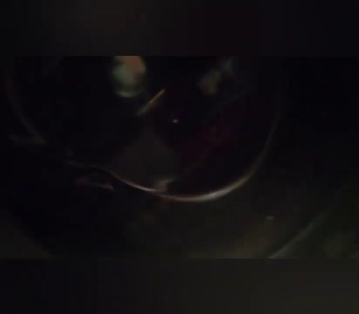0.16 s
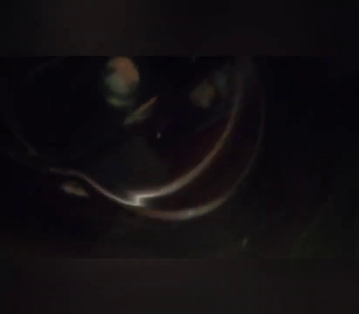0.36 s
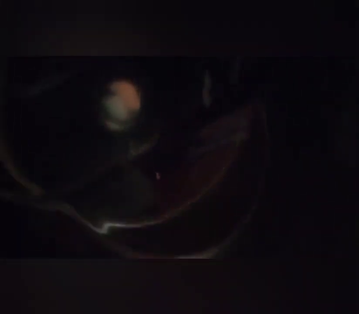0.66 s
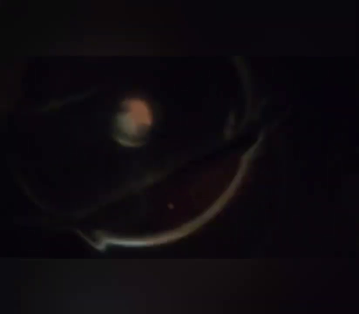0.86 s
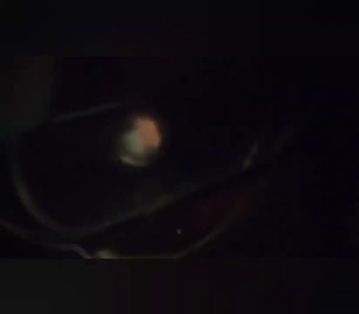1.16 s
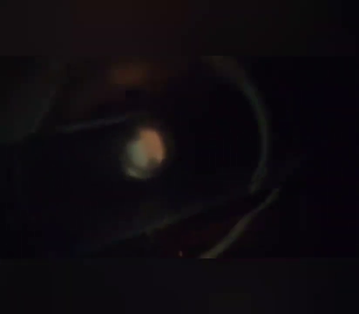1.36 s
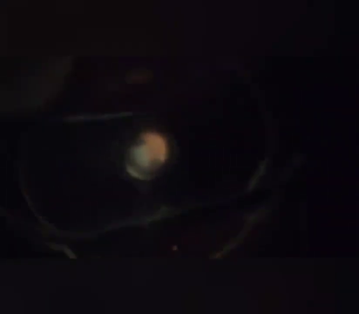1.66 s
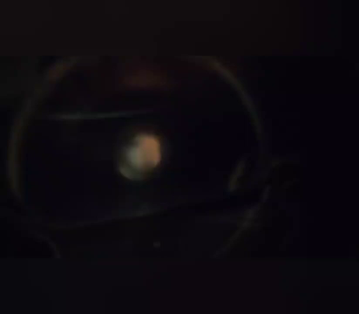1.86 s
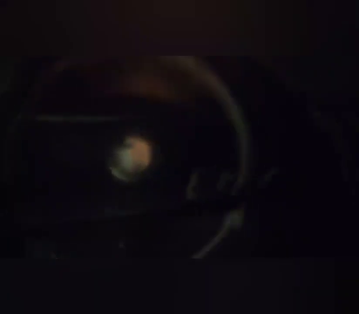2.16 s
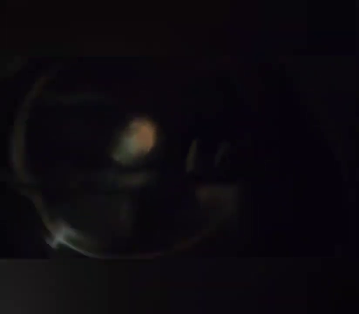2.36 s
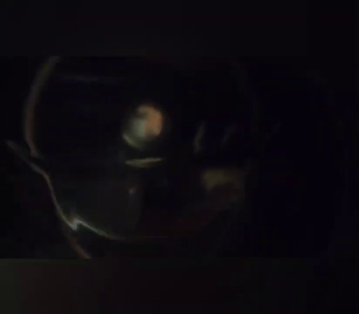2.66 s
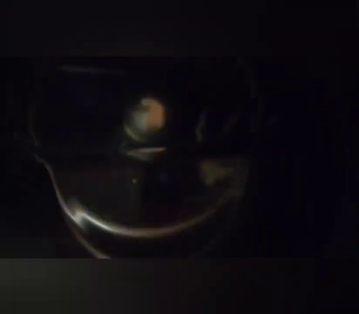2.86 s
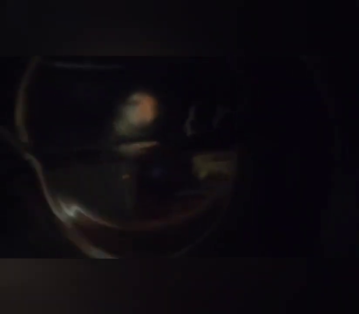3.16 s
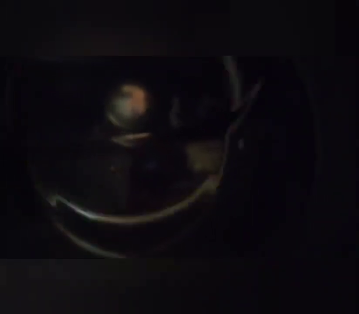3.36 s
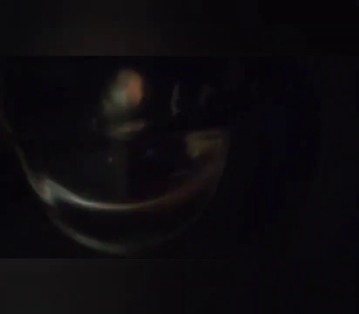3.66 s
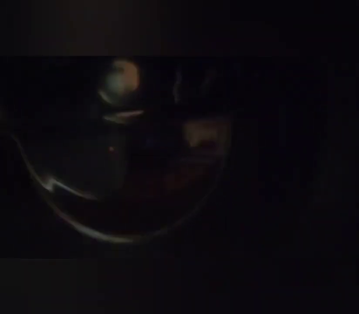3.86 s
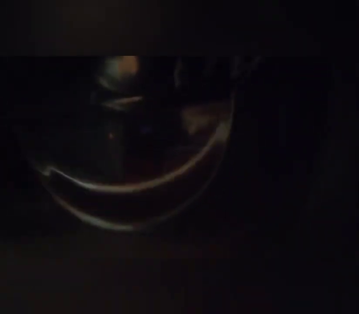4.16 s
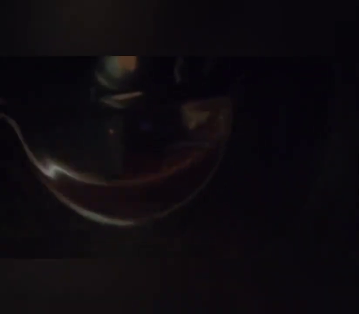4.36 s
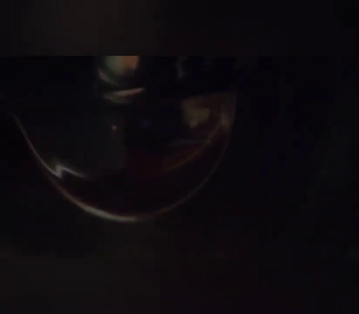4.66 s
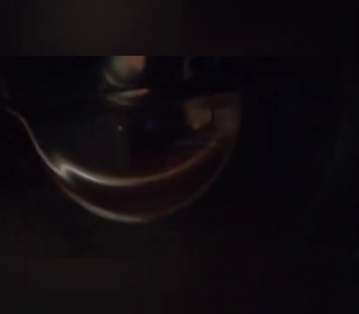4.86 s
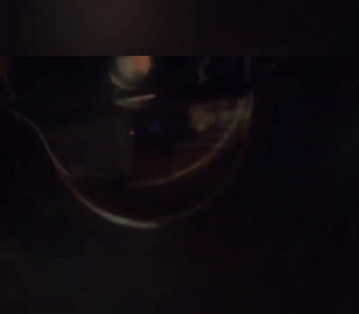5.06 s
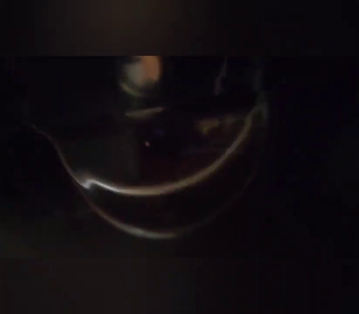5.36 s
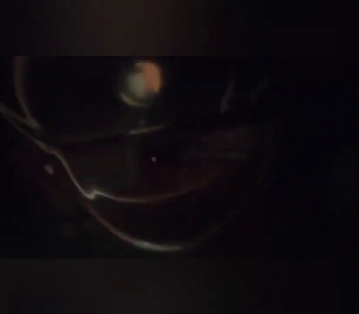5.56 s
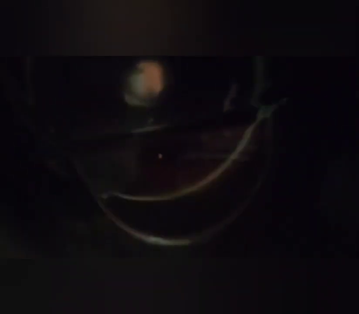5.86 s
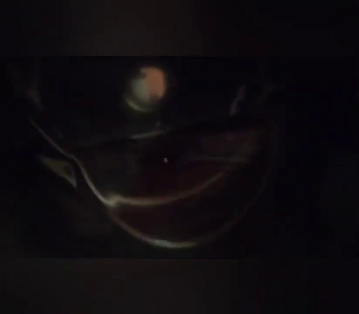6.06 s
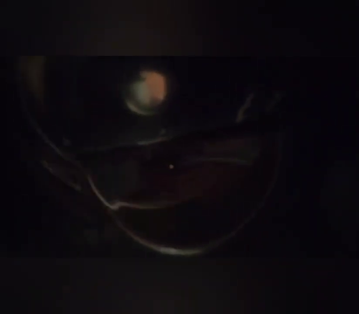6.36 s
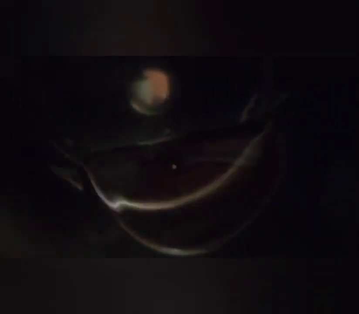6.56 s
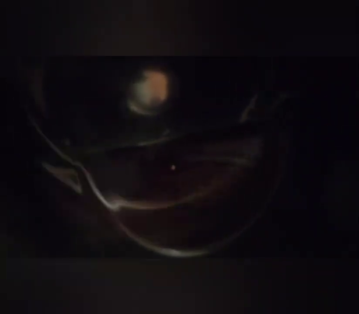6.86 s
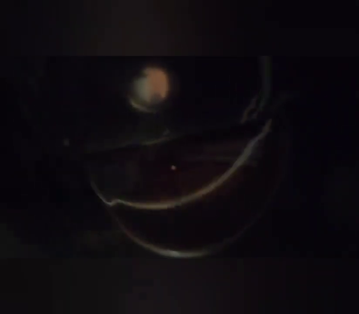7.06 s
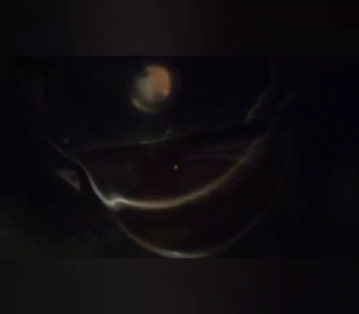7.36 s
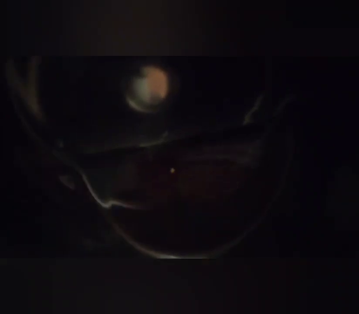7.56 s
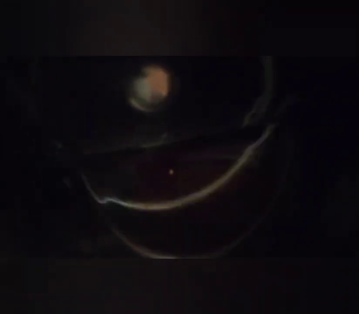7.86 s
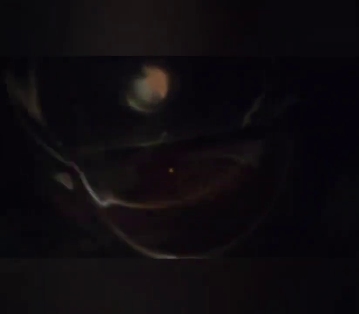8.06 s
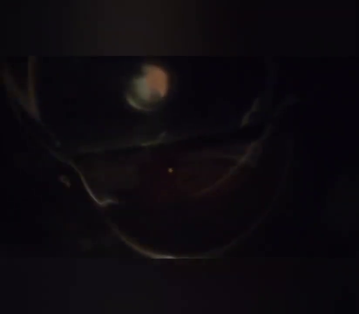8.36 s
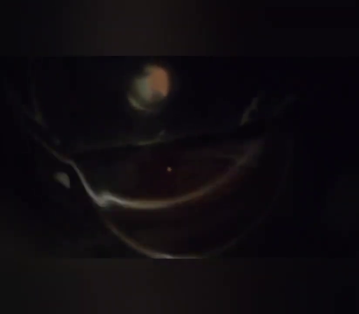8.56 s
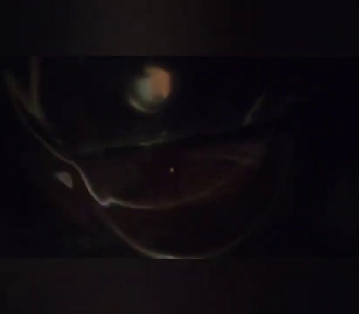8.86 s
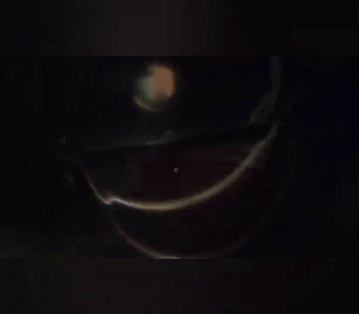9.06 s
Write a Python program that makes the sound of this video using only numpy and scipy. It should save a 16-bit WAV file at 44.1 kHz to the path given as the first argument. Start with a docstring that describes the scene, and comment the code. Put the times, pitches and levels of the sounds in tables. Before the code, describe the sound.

A front-loading washer spins fast and steadily, its drum throbbing deeply about twelve times a second beneath a piercing, fluttering motor whine.

```python
"""Washing machine in a fast spin

A front-loader spins steadily at about 750 rpm in a small room, heard by a hand-held stereo microphone near its door.
The unbalanced load shoves the cabinet and taps a loose panel once a turn: both are sums or rings locked to the drum.
Bearings and panels rattle in a pattern repeated each turn, and the mains hum beats slowly with the drum's throb.
The belt-driven motor buzzes and whines; its speed sways with every drum turn, and wall echoes make the whine flutter.
Shaped noise gives the air churned by the drum and the hiss of the brushes."""
import sys
import numpy as np
from scipy.fft import rfft, irfft, next_fast_len
from scipy.io import wavfile
from scipy.ndimage import uniform_filter1d, map_coordinates

SR = 44100
rng = np.random.default_rng(int(sys.argv[2]) if len(sys.argv) > 2 else 0)


def unload_wav(signal):
    """Save mono or channel-first audio to the path in sys.argv[1] as 16-bit WAV at rate SR, clipped to [-1, 1]."""
    wavfile.write(
        sys.argv[1],
        SR,
        np.round(np.clip(np.atleast_2d(signal).T, -1, 1) * 32767).astype(np.int16),
    )


N = 405719
T = np.arange(N) / SR  # time of each sample [s]

DRUM_HZ = 12.4465  # drum turns a second
MOTOR_HZ = 197.91  # mean motor turns a second
MAINS_HZ = 49.95
TOP_HZ = 15700  # band limit of the recorder


def amp(db):
    """Decibels to gain."""
    return 10 ** (np.asarray(db) / 20)


def along(points, hz):
    """(frequency [Hz], value) points read on a log frequency axis."""
    f, v = np.transpose(points)
    return np.interp(np.log(hz + 1), np.log(f + 1), v)


def curves(rows):
    """One value per sample for each column after the time."""
    s, *cols = np.transpose(rows)
    return np.array([np.interp(T, s, c) for c in cols])


def meander(steps):
    """A smooth random value for each sample's place on a path, one knot a step."""
    coarse = np.abs(steps[::64])
    knots = rng.standard_normal(1024)
    smooth = map_coordinates(knots, [coarse], mode="mirror")
    return np.interp(T, T[::64], smooth)


def wobble(rate):
    """A smooth random curve in time, rate knots a second."""
    return meander(rate * T)


def filtered(x, response):
    """x times a response of frequency, zero-padded so that its end does not wrap round."""
    m = next_fast_len(N + SR // 4)
    return irfft(rfft(x, m) * response(np.fft.rfftfreq(m, 1 / SR)), m)[..., :N]


def cycle(lines, size=8192):
    """The sound of one turn from its complex rms multiples 1, 2, ..; read it at any number of turns."""
    shape = irfft(np.r_[0, lines], size) * size / np.sqrt(2)
    step = np.roll(shape, -1) - shape

    def read(turns):
        at = turns * size
        whole = np.floor(at)
        i = whole.astype(int) % size
        return shape[i] + (at - whole) * step[i]
    return read


def scattered(gains):
    """Lines of the given strengths at random phases."""
    return gains * np.exp(2j * np.pi * rng.random(len(gains)))


def sides(lean_db):
    """Left and right gains, lean_db apart, at constant power."""
    ratio = amp(lean_db)
    return np.array([ratio, np.ones_like(ratio)]) * np.sqrt(2 / (1 + ratio ** 2))


def load(t, peak_s):
    """The pull of the unbalanced load, once a drum turn."""
    return np.cos(2 * np.pi * DRUM_HZ * (t - peak_s))


def throb(depth_db, peak_s, count=1):
    """A swell and a notch, count times a drum turn, as a swaying tone beats against its strongest echo."""
    echo = np.clip(np.log(amp(depth_db)), -.9, .9)  # a negative depth puts the notch at peak_s
    return np.sqrt(1 + 2 * echo * load(count * T, count * peak_s) / (1 + echo ** 2))


# the hand's path through the echoes, quick in three spells and slow between:
# (time [s], path travelled [cm])
HAND_PATH = [(0, 0), (2.5, 22.5), (3.3, 24), (4.1, 28.5), (5.2, 31), (6.2, 37.5), (9.2, 41)]


def room(sound, wall_db, spread_s, sway_s, apart_s, count=4, patch_cm=6):
    """Each ear gets sound(time) directly and off walls whose paths meander as the hand travels."""
    travel_cm, = curves(HAND_PATH)
    ears = []
    for lead in (apart_s / 2, -apart_s / 2):
        ear = sound(T + lead)
        delays = spread_s * (np.arange(count) + rng.random(count)) / count
        for delay in delays:
            sway = sway_s * meander(travel_cm / patch_cm)
            ear = ear + amp(wall_db) * sound(T - delay - sway)
        ears.append(ear / np.sqrt(1 + count * amp(wall_db) ** 2))
    return np.array(ears)


def motor_turns(sway=.0026, fastest_s=.006, drift=.0003):
    """The motor's angle as a function of time: the load speeds and brakes it through the belt."""
    speed_hz = MOTOR_HZ * (1 + sway * load(T, fastest_s) + drift * wobble(14))
    ahead = np.cumsum(speed_hz) / SR - MOTOR_HZ * T
    return lambda t: MOTOR_HZ * t + ahead[np.clip((t * SR).astype(int), 0, N - 1)]


# the cabinet's answer to the load, before the microphone's place colours it:
# (multiple of the drum speed, level [dB rms])
CABINET_LINES = [(1, -41.5), (2, -60), (3, -51), (4, -52), (5, -43.1), (6, -57), (7, -55.5), (8, -58.5),
                 (9, -31), (10, -35.3), (11, -34.5), (12, -55.5), (13, -57), (14, -58), (15, -48),
                 (16, -61.5), (17, -56), (18, -67), (19, -60), (20, -59.5), (21, -46), (22, -56.5),
                 (23, -61), (24, -56), (25, -63), (26, -61), (27, -66), (28, -53.5), (29, -63), (30, -61),
                 (31, -65), (32, -67)]


def cabinet(size=128):
    """One shove a turn: the cabinet booms at once and rings down until the next."""
    order, db = np.transpose(CABINET_LINES)
    level_db = np.interp(np.arange(size // 2 + 1), order, db)
    # fold the cepstrum forward: minimum phase, so that the ring follows the shove
    cepstrum = irfft(np.log(amp(level_db)))
    cepstrum[1:size // 2] *= 2
    cepstrum[size // 2 + 1:] = 0
    boom = cycle(np.exp(rfft(cepstrum))[1:len(order) + 1])
    turns = DRUM_HZ * T + 0.0026 * wobble(7.2)
    return boom(turns) * amp(0.14 * wobble(5))


def knock(ring_hz=792):
    """A loose panel is tapped softly once a drum turn and rings briefly."""
    level_db, onset_s, attack_s, t60_s = -32.5, .006, .008, .06
    age = (T - onset_s) % (1 / DRUM_HZ)  # seconds since the last tap
    decay = amp(level_db - 60 * age / t60_s + 0.74 * wobble(12))
    envelope = (1 - np.exp(-age / attack_s)) * decay
    return envelope * np.sin(2 * np.pi * ring_hz * age)


# bearings and panels, before the microphone's place colours them:
# (frequency [Hz], level of each drum multiple [dB rms])
RATTLE_LEVELS = [(400, -61.5), (490, -64), (570, -57.5), (640, -63.5), (700, -55), (790, -53), (840, -54.5),
                 (920, -62.5), (1100, -62), (1400, -64.5), (1800, -65.5), (2250, -70), (2480, -66),
                 (3000, -85)]


def rattle(apart_hz=1100):
    """Bearings and panels repeat nearly the same pattern every turn; short waves reach the ears out of step."""
    first = len(CABINET_LINES) + 1  # the multiples above the cabinet's own
    hz = DRUM_HZ * np.arange(first, 250)
    lines = scattered(amp(along(RATTLE_LEVELS, hz) + rng.normal(0, 1, len(hz))))
    twist = np.exp(1j * rng.standard_normal(len(hz)) * hz / apart_hz)
    turns = DRUM_HZ * (T + .00003 * wobble(20))
    below = np.zeros(first - 1)
    ears = [cycle(np.r_[below, lines * ear])(turns) for ear in (twist, 1 / twist)]
    return np.array(ears) * amp(0.68 * load(T, 0.0082) + 0.21 * wobble(11))


# mains hum, before the microphone's place colours it:
# (multiple of the mains frequency, level [dB rms])
HUM_LINES = [(2, -41.3), (3, -60), (4, -56.5), (6, -50.5), (8, -61.5)]


def hum():
    """The mains hum of the windings slides slowly against the drum's throb."""
    return sum(np.sqrt(2) * amp(db) * np.sin(2 * np.pi * round(k) * MAINS_HZ * T)
               for k, db in HUM_LINES)


# rotor unbalance and slot tones, relative: (multiple of the motor speed, level [dB])
ROTOR_LINES = [(1, -45), (2, -52), (4, -53), (13, -61), (24, -60), (28, -60), (54, -67), (72, -70)]
# buzz of the brushes, relative: (frequency [Hz], level of each motor multiple [dB])
BUZZ_LEVELS = [(600, -73), (1700, -70), (2300, -57), (3350, -62), (4300, -71), (5300, -70.5), (6200, -61),
               (7600, -60.5), (8600, -68), (9400, -69), (10200, -73), (12000, -87.5), (14500, -78),
               (15500, -90)]


def buzz(angle):
    """The rotor and its brushes give a comb of motor multiples, all but the lowest swelling with the load."""
    db = along(BUZZ_LEVELS, MOTOR_HZ * np.arange(1, 79))
    for order, level in ROTOR_LINES:
        db[round(order) - 1] = level
    lines = scattered(amp(db))
    low = np.arange(len(lines)) < 4
    shake, brushes = cycle(lines * low), cycle(lines * ~low)
    comb = room(lambda t: brushes(angle(t)), wall_db=-2, spread_s=.06, sway_s=.00012,
                apart_s=.00003, count=5)
    swell = amp(1.8 * load(T, -.002) - .6)
    # the long waves of the lowest multiples reach both ears alike
    return shake(angle(T)) * amp(wobble(2.035)) + comb * swell


# how alike the air noise is at both ears: (frequency [Hz], left-right correlation [-1 to 1])
EAR_LIKENESS = [(30, 1), (100, -0.52), (250, 0.28), (500, -0.36), (1000, -0.44), (2500, -0.056),
                (8000, -0.18)]


def rush(spectrum):
    """Stereo noise, fully alike at both ears only in the deepest bass."""
    def response(hz):
        turn = np.arccos(np.clip(along(EAR_LIKENESS, hz), -1, 1)) / 2
        return amp(along(spectrum, hz)) * [np.cos(turn), np.sin(turn)]

    white = rng.standard_normal((2, N)) * np.sqrt(SR / 2)  # unit power per Hz
    mid, side = filtered(white, response)
    return np.array([mid + side, mid - side])


# air swept round by the drum, relative: (frequency [Hz], density [dB per Hz])
AIR_SPECTRUM = [(12, -69), (45, -79), (62, -61.5), (85, -67), (125, -62), (220, -67.5), (350, -69.5),
                (500, -77), (780, -69.5), (1500, -74), (2500, -80), (3300, -82.5), (5000, -105)]
# brush hiss, relative: (frequency [Hz], density [dB per Hz])
HISS_SPECTRUM = [(2000, -105), (3300, -79.5), (4300, -86), (6200, -82.5), (7500, -79.5), (9000, -93),
                 (11500, -102), (14500, -103), (15700, -108)]


def air(angle):
    """The drum churns the air; the brushes hiss harder once a motor turn and under load."""
    churn = rush(AIR_SPECTRUM) * amp(0.54 * load(T, 0.037) + 0.43 * wobble(7.9))
    hiss = rush(HISS_SPECTRUM) * amp(0.51 * np.cos(2 * np.pi * angle(T)) + 0.2 * load(T, -0.0051))
    return churn + hiss


# the machine's lean across the stereo microphone: (frequency [Hz], left minus right [dB])
STEREO_LEAN = [(100, .7), (250, 1.5), (500, 1.5), (1100, 5.5), (2500, 5), (4500, 3), (6500, 4), (7200, 0),
               (8300, -10), (9700, 0), (12000, 1), (14500, 5)]
# band gains at the moving microphone:
# (time [s], low mids [dB], upper mids [dB], treble [dB])
BAND_REACH = [(0, -0.9, 0.3, 3.4), (1.3, 2, -2.3, 3), (2.6, -0.4, -3.5, 2.2), (3.4, -1.0, -3, 2),
              (4.1, -1, 1, 1), (5.3, -0.3, -0.9, 1.5), (6.5, 0.4, -0.5, 1.5), (9.2, 1.2, 0.1, 0.9)]
# middles of the three bands, between two steady ends: frequency [Hz]
BAND_CENTRES = [230, 750, 2000, 5500, 40000]


def position(x):
    """Each band has its own left-right lean; three bands come and go as the microphone moves."""
    x = filtered(x, lambda hz: sides(along(STEREO_LEAN, hz)))
    out = x
    for k, db in enumerate(curves(BAND_REACH)):
        # a triangle: one at this band's middle, zero at its neighbours'
        share = list(zip(BAND_CENTRES, np.arange(len(BAND_CENTRES)) == k + 1))
        band = filtered(x, lambda hz: along(share, hz))
        out = out + band * (amp(db) - 1)
    return out


def whine(angle, order, heard, wall_db, flicker_db, evenness, shared, split_db=3):
    """A swaying motor tone beats against its echoes; evenness sets its steadiness, from fluttering to smooth."""
    level_db, lean_db = curves(heard)
    tone = room(lambda t: np.cos(2 * np.pi * order * angle(t)), wall_db, spread_s=.08,
                sway_s=.0001, apart_s=.00003, count=6)
    tone = tone + shared * tone[::-1]  # the ears are close, so they share part of their echoes

    def rms(size):
        return np.sqrt(np.abs(uniform_filter1d(tone ** 2, size, axis=1)) + 1e-9)

    # levelling over a whole turn keeps the flutter, levelling over 128 samples smooths it
    even = np.clip(evenness, 0, .8)
    flutter = tone / (rms(128) ** even * rms(round(SR / DRUM_HZ)) ** (1 - even))
    # where evenness is low, the tone also breaks into two pulses a turn and flickers
    split = throb(split_db * (1 - even), peak_s=0.0083, count=2)
    level = amp(level_db + flicker_db * (1 - even) * wobble(60))
    return level * sides(lean_db) * flutter * split / np.sqrt(2)


# the commutator tones, as the microphone passes through their standing waves, before they throb:
# (time [s], amplitude [dB], left minus right [dB])
LOWER_TONE = [(0, -33, 16), (0.55, -38.5, -2), (0.8, -36.3, 11), (1.05, -38.5, 14), (1.8, -39.5, 10),
              (2.1, -33, 7), (3.15, -33.5, 9), (3.55, -30, 11), (4.25, -37, -6.5), (5.25, -36, -2),
              (6.05, -43.5, 2), (6.9, -38.5, 4.5), (9.2, -40, 4)]
UPPER_TONE = [(0, -37, -1), (0.35, -36, -5), (0.8, -42.5, -1), (1.1, -36, 6), (1.6, -46.1, -1),
              (1.95, -36.5, 10), (2.25, -38, -9), (2.6, -40, -1), (3.4, -41, -5), (3.8, -37.5, 1),
              (5.05, -41, 0), (5.5, -43.5, 2), (5.85, -39, -17), (6.6, -37.5, -3), (9.2, -40, 1)]
# the fainter slot tone between the two: (time [s], amplitude [dB], left minus right [dB])
SLOT_TONE = [(0, -48.5, 8), (1.2, -49.5, 28), (2.2, -52.5, 6), (4.5, -48, 4), (6, -48.5, 10),
             (9.2, -55.5, 6)]
# the lower tone's throb, and the evenness from which both commutator tones start:
# (time [s], throb depth [dB], evenness [0 to 1])
LOWER_THROB = [(0, -3.5, .1), (1.8, -3, .1), (2.15, 6, .6), (2.7, -.8, .55), (3.5, -.5, .6),
               (4.2, -2.2, .6), (5.15, -1.2, .6), (5.7, 1.5, .1), (6.7, 7.5, .8), (8, 6, .75),
               (9.2, 5.5, .75)]


def motor_tones(angle):
    """Two commutator tones and a slot tone, all swelling with the load; the commutator tones grow even together."""
    throb_db, evenness = curves(LOWER_THROB)
    lower = whine(angle, order=18, heard=LOWER_TONE, wall_db=-6.5, flicker_db=2.5,
                  evenness=evenness, shared=0.2)
    upper = whine(angle, order=36, heard=UPPER_TONE, wall_db=-1, flicker_db=2.5,
                  evenness=evenness + 0.21, shared=0.18)
    slot = whine(angle, order=30, heard=SLOT_TONE, wall_db=-6, flicker_db=1.0,
                 evenness=0.12, shared=.3)
    lower = lower * throb(depth_db=0.95, peak_s=0.00091) * throb(throb_db, peak_s=0.018)
    return lower + (upper + slot) * throb(depth_db=2.5, peak_s=0.0012)


def scene():
    """Drum and motor, heard from in front of the door."""
    angle = motor_turns()
    drum = cabinet() + knock() + rattle()
    motor = amp(-0.3) * buzz(angle)
    machine = position(drum + hum() + motor + air(angle))
    return machine + motor_tones(angle)  # the tones carry their own lean and level


def record(dry):
    """The recorder keeps nothing above its band limit."""
    return filtered(dry, lambda hz: hz < TOP_HZ)


dry = scene()
out = record(dry)
unload_wav(out)
```